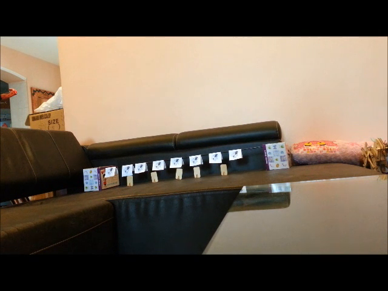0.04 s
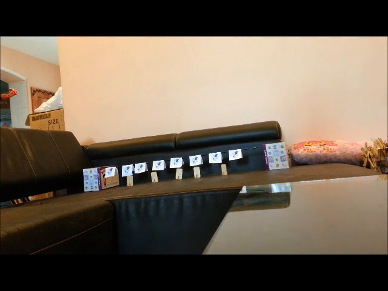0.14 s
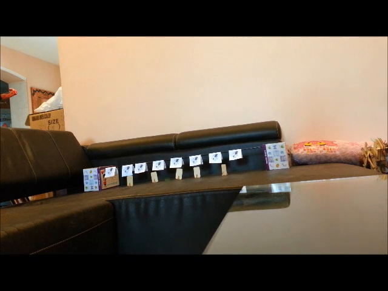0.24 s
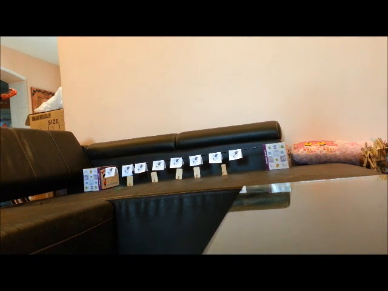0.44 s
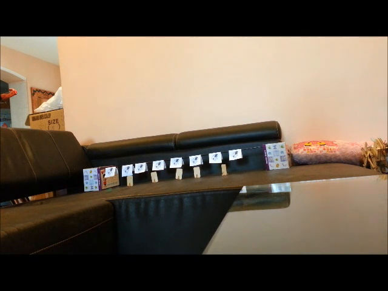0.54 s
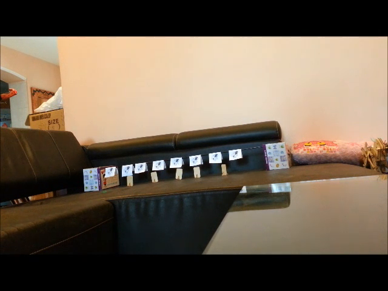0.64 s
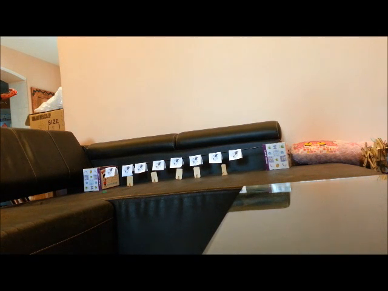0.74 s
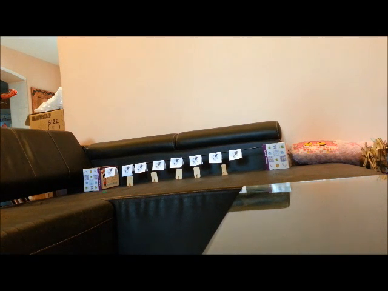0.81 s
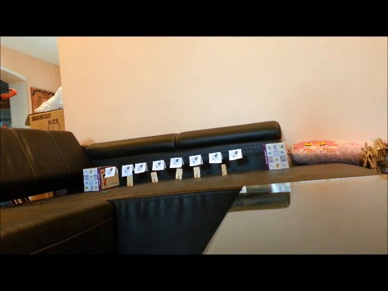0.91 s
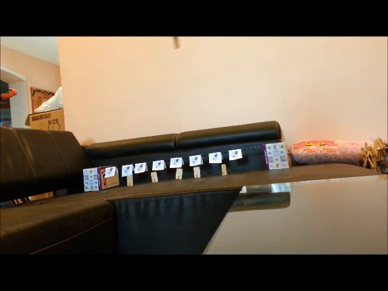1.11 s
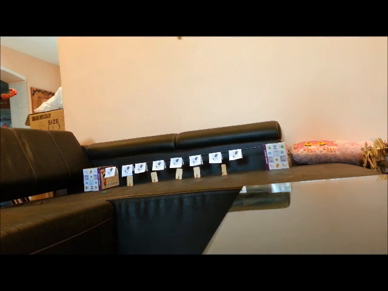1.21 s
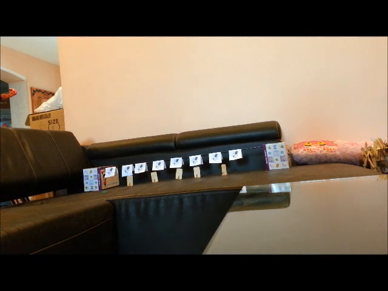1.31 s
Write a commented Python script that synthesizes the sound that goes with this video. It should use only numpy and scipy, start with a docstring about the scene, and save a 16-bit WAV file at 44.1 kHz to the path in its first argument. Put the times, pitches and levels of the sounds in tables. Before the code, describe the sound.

A rubber band launcher fires close to the microphones: soft cloth rustle, quick catch clicks and scrape, then one loud dry snap with wall echoes and a short living room tail, fading to quiet hum.

```python
"""A living room, with a homemade rubber band launcher fired close to a camera's microphones.
Room tone and cloth come first, as filtered noise whose level drifts or swells; then the catch scrapes
(grainy noise with a whine) and ticks (short decaying sines). The band snaps against the frame, a sum of
dying partials; nearby walls answer with delayed copies and the room with a tail of random taps.
Hum and soft cloth remain, with three faint late ticks."""
import sys
import numpy as np
from scipy import signal
from scipy.io import wavfile
from scipy.ndimage import uniform_filter1d

SR = 44100
rng = np.random.default_rng(int(sys.argv[2]) if len(sys.argv) > 2 else 0)


def boost_factor(decibels):
    """Convert a level in decibels to a linear amplitude factor."""
    exponent = np.asarray(decibels, float) / 20
    return 10 ** exponent


def materialize(psi):
    """Save the field psi as 16-bit PCM at rate SR to the path in sys.argv[1].

    A 1-D psi becomes a single channel; in a 2-D psi each row is a channel.
    """
    bounded = np.clip(np.atleast_2d(psi).T, -1, 1)
    quanta = np.round(bounded * 32767).astype(np.int16)
    wavfile.write(sys.argv[1], SR, quanta)


N = 59535  # length in samples
SNAP_S = .2833  # when the band strikes the frame


def evened(x):
    """Scale to an RMS of one."""
    return x / np.sqrt(np.mean(x ** 2) + 1e-20)


def read(points, hz):
    """Read a curve of (Hz, value) points, interpolating along log frequency."""
    f, value = np.transpose(points)
    return np.interp(np.log(hz + 1), np.log(f + 1), value)


def add(mix, s, sound):
    """Lay a sound into the mix from s seconds on, cut at the end of the mix."""
    part = mix[:, round(s * SR):][:, :sound.shape[-1]]
    part += sound[..., :part.shape[1]]


def sides(pan_db):
    """Left and right gains that differ by pan_db; negative leans right."""
    return boost_factor(np.array([[pan_db / 2], [-pan_db / 2]]))


def resonant_noise(hz, width_hz, source):
    """White noise through one resonance: a fuzzy tone."""
    return evened(signal.lfilter(*signal.iirpeak(hz, hz / width_hz, SR), source))


def noise(colour, likeness, patchy_db, size=512, lag_s=0):
    """Stereo noise from random short-time spectra with drifting patches; the left side lags by lag_s."""
    hop, hz = size // 4, np.fft.rfftfreq(size, 1 / SR)
    a, b, c, d, patches = rng.standard_normal((N // hop + 5, len(hz), 5)).T
    patches = uniform_filter1d(patches, size=5, axis=0)  # smooth over frequency
    patches = evened(uniform_filter1d(patches, size=6, axis=1))  # and over time
    same = np.clip(read(likeness, hz), -1, 1)[:, None]
    left, other = a + 1j * b, c + 1j * d
    lead = np.exp(2j * np.pi * hz * lag_s)[:, None]
    right = same * lead * left + np.sqrt(1 - same ** 2) * other
    level_db = read(colour, hz)[:, None] + patchy_db * patches
    spectra = np.array([left, right]) * boost_factor(level_db)
    return evened(signal.istft(spectra, nperseg=size, noverlap=size - hop)[1][:, :N])


# Murmur of the house and hiss of the microphones. Each row: frequency in Hz, relative density in dB per Hz.
HUM_COLOUR = [(12, -64), (20, 5.5), (140, -17), (171, -11.5), (274, -11), (342, -16), (416, -12.5),
              (465, -10.5), (1160, -19), (1270, -24), (1380, -19), (13900, -41), (15500, -36.5)]
# How alike the two microphones hear it. Each row: frequency in Hz, left-right likeness up to 1.
HUM_LIKENESS = [(60, .7), (250, 0.79), (600, 0.97), (1500, 0.37), (5000, 0.068), (14000, 0.094)]
# The fuzzy tone in the hum. One row: centre in Hz, width in Hz, level in dB.
HUM_TONE = (410, 25.5, -55.5)


def hum():
    """Steady low murmur of the house with microphone hiss, plus noise through one narrow resonance."""
    hz, width_hz, tone_db = HUM_TONE
    tone = resonant_noise(hz, width_hz, rng.standard_normal(N))
    murmur = noise(HUM_COLOUR, HUM_LIKENESS, patchy_db=2.0, size=1024, lag_s=0.00026)
    return boost_factor(-45.5) * murmur + boost_factor(tone_db) * tone


# Cloth rubbing near the camera, in two stretches. Each row: time in seconds, level in dB before panning.
RUSTLE_LEVEL = [
    [(0.0, -49), (0.016, -50.5), (0.058, -39.5), (0.138, -38.5), (0.222, -45), (0.226, -38.5)],
    [(0.62, -71), (0.726, -67), (0.928, -58), (0.94, -55), (1.192, -55), (1.21, -65), (1.332, -47),
     (1.35, -53)],
]
# Colour of the cloth at that distance. Each row: frequency in Hz, relative density in dB per Hz.
CLOTH_COLOUR = [(300, -13.5), (1000, -10), (2000, -7), (3200, -0.5), (4800, -5), (7000, -11.5),
                (11000, -12.5), (14500, -17.5), (15500, -54)]


def rustle():
    """Soft hiss of cloth: friction noise that swells with each movement, a little to the right."""
    s, db = np.transpose(RUSTLE_LEVEL[0] + RUSTLE_LEVEL[1])
    swell = boost_factor(np.interp(np.arange(N) / SR, s, db))
    hiss = noise(CLOTH_COLOUR, [(1000, 0.13)], patchy_db=1.0)
    return swell * sides(-1.5) * hiss


# Scrape of band and catch. Each row: time in seconds, level in dB before panning, whine share from 0 to 1.
SCRAPE_LEVEL = [(.2288, -55, .1), (.2298, -30, .1), (.2335, -27, .1), (.238, -31, .2), (.2405, -39, .4),
                (.25, -37, .75), (.262, -37, .8), (.266, -29, .4), (.2695, -33, .6), (.277, -31, .3),
                (.2825, -34, .7), (.285, -70, .5)]
# Colour of the grit in the scrape. Each row: frequency in Hz, relative density in dB per Hz.
GRIT_COLOUR = [(120, -41), (200, -9.5), (1560, -8.5), (3820, -9.5), (6830, -10), (9660, -7), (13200, -24),
               (14700, -11), (15500, -43)]


def scrape():
    """Friction of band and catch: grainy noise crossfaded by power with a resonant whine."""
    s, db, share = np.transpose(SCRAPE_LEVEL)
    t = np.arange(N) / SR
    share = np.clip(np.interp(t, s, share), 0, 1)
    grit = noise(GRIT_COLOUR, [(1000, 0.45)], patchy_db=3, size=128)
    source = rng.standard_normal((2, N)) + 1.9 * rng.standard_normal(N)  # own part plus shared part
    whine = resonant_noise(4500, 600, source)
    level = boost_factor(np.interp(t, s, db, left=-120, right=-120))
    return level * (np.sqrt(1 - share) * grit + np.sqrt(share) * whine)


# Ticks of the catch. Each row: start in seconds, level in dB before decay and panning, ring in Hz,
# nominal length in cycles.
CATCH_TICKS = [(.2297, -22, 5000, 5), (.2299, -27, 13500, 5), (.2319, -24, 2100, 2), (.2328, -19, 2700, 3),
               (.2331, -23, 9500, 6), (.2343, -19, 3400, 4), (.2377, -21, 4000, 4), (.2491, -25, 5000, 3),
               (.2644, -18, 4500, 7), (.2658, -20, 4600, 4), (.2671, -10, 4700, 9), (.2673, -23, 9800, 5),
               (.2683, -24, 1300, 2), (.2706, -19, 4550, 10), (.2755, -25, 2000, 3), (.2762, -29, 13800, 8),
               (1.3265, -33, 4600, 5), (1.327, -29, 8500, 1), (1.3385, -35, 2500, 2)]


def catch():
    """The scrape and short ringing ticks, right of centre; ticks reach the left microphone later."""
    lag_s, pan_db = .00007, -3
    out = scrape()
    for start, level_db, hz, cycles in CATCH_TICKS:
        turns = np.arange(600) / SR * hz
        shape = np.minimum(turns / .4, 1) * np.exp(-(1.3 * turns / cycles) ** 2)
        tick = boost_factor(level_db) * np.sin(2 * np.pi * turns) * shape
        add(out[:1], start + lag_s, tick)
        add(out[1:], start, tick)
    return out * sides(pan_db)


# How fast the living room dies away. Each row: frequency in Hz, t60 in seconds before the extra bend.
ROOM_T60 = [(120, 0.9), (300, 0.15), (550, 0.87), (1000, 0.64), (2500, 0.75), (5000, 0.68), (9000, 0.61),
            (14000, 0.14)]
# Colour of the tail at its start. Each row: frequency in Hz, relative level in dB.
TAIL_COLOUR = [(120, -1.5), (250, -3), (400, 0), (550, 4.5), (800, 3), (1200, 3), (1800, 1.5), (2600, -2),
               (3500, -9.5), (4700, -5.5), (6500, -14.5), (9000, -15.5), (14000, -23.5)]
# How alike the tail is at both microphones. Each row: frequency in Hz, left-right likeness from 0 to 1.
TAIL_LIKENESS = [(150, .9), (400, 1), (1000, 0.1), (3000, 0.042), (12000, 0.035)]


def room(x):
    """Sparse taps of random sign that build up, each band dying at its own speed."""
    room_db, rise_s, bend = 8, 0.018, 27  # bend: extra fall, dB per s squared
    taps = np.zeros((2, SR))
    slots = np.arange(200, SR - 20, 12)  # one tap in every 12 samples
    at = slots + rng.integers(0, 12, (2, len(slots)))
    np.put_along_axis(taps, at, rng.choice([-1., 1.], at.shape), 1)
    rise = np.minimum(np.arange(SR) / SR / rise_s, 1)
    hz, t, (a, b) = signal.stft(taps * rise, SR, nperseg=256)
    same = np.clip(read(TAIL_LIKENESS, hz), 0, 1)[:, None]
    mid, side = np.sqrt((1 + same) / 2) * a, np.sqrt((1 - same) / 2) * b
    fall_db = 60 * t / read(ROOM_T60, hz)[:, None] + bend * t ** 2
    spectra = np.array([mid + side, mid - side]) * boost_factor(read(TAIL_COLOUR, hz)[:, None] - fall_db)
    tail = signal.istft(spectra, SR, nperseg=256)[1]
    tail = tail / np.linalg.norm(tail[0])
    return boost_factor(room_db) * signal.fftconvolve(x[None], tail, axes=1)[:, :N]


# What the frame rings with. Each row: frequency in Hz, relative starting level in dB, t60 in seconds.
FRAME_PARTIALS = [(420, -16, .02), (600, -11, .016), (785, -3, .02), (1350, -6, .007), (1900, -3, .006),
                  (2600, -4, .006), (3700, -14, .006), (4900, -8, .005), (5500, -16, .007),
                  (9300, -18, .004), (12500, -22, .003)]


def snap():
    """One blow of the band rings the frame: decaying partials, those above 1 kHz with flipped sign."""
    t = np.arange(3000) / SR
    ring = np.zeros(len(t))
    for hz, db, t60 in FRAME_PARTIALS:
        sign = -1 if hz > 1000 else 1
        ring += sign * boost_factor(db - 60 * t / t60) * np.sin(2 * np.pi * hz * t)
    return boost_factor(-1) * ring * np.minimum(t / .00008, 1)  # brief onset ramp


# First echoes off the walls. Each row: delay in seconds, level in dB against the blow before panning,
# left over right in dB, lag of the left microphone in seconds, brightness from 0 to 1.
WALL_ECHOES = [(.0024, -14, -3, .0002, .9), (.0036, -10, 3, .0004, .1), (.0084, -3, -2, 0, .7),
               (.0090, -6, 0, 0, 1), (.0101, -8, -3, .0003, .6), (.0107, -6, 0, .0002, .6),
               (.0122, -11, -3, .0003, .3), (.0145, -13, 2, -.0003, .1), (.0200, -11, 2, .0005, .2)]


def echoes(blow):
    """The blow and its first reflections as delayed copies; bright ones lose their bass."""
    out = np.zeros((2, N))
    thin = signal.lfilter(*signal.butter(1, 1800, "high", fs=SR), blow)
    add(out, SNAP_S, blow)
    for delay, db, pan_db, lag_s, bright in WALL_ECHOES:
        both = boost_factor(db) * sides(pan_db) * ((1 - bright) * blow + bright * thin)
        add(out[:1], SNAP_S + delay + lag_s / 2, both[0])
        add(out[1:], SNAP_S + delay - lag_s / 2, both[1])
    return out


def scene():
    """Launcher and its room, with cloth and hum; small parts radiate no deep bass."""
    parts = catch()
    crack = boost_factor(6.5) * (np.arange(N) == round(SNAP_S * SR))  # the snap as the room hears it: one impulse
    launcher = echoes(snap()) + parts + room(crack + boost_factor(-10.5) * parts.mean(0))
    launcher = signal.lfilter(*signal.butter(2, 170, "high", fs=SR), launcher)
    return launcher + rustle() + hum()


def low_pass(x):
    """Removes everything above the highest recorded frequency."""
    return signal.sosfilt(signal.butter(12, 15840, fs=SR, output="sos"), x)


def record(dry):
    """The camera's gain control ducks just after loud sound; then soft overload, low cut, band limit."""
    duck_at_db, duck_share = -29, 0.2  # share: dB of ducking per dB above the threshold
    envelope_fall_db_per_s = 90
    power = uniform_filter1d((dry ** 2).mean(0), size=441, origin=220)  # over the past 10 ms
    power_db = 10 * np.log10(abs(power) + 1e-12)
    fall = np.arange(N) * envelope_fall_db_per_s / SR
    envelope_db = np.maximum.accumulate(power_db + fall) - fall  # rises at once, falls steadily
    over_db = np.maximum(envelope_db - duck_at_db, 0)
    x = dry / boost_factor(duck_share * uniform_filter1d(over_db, size=301, origin=150))
    x = 1.413 * np.tanh(x / 1.21)
    x = signal.lfilter(*signal.butter(2, 202, "high", fs=SR), x)
    x = signal.oaconvolve(x, signal.firwin(255, 14620, fs=SR)[None], "same")
    return low_pass(x)


dry = scene()
out = record(dry)
materialize(out)
```